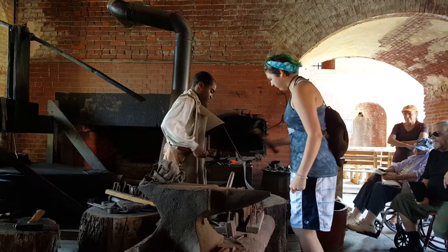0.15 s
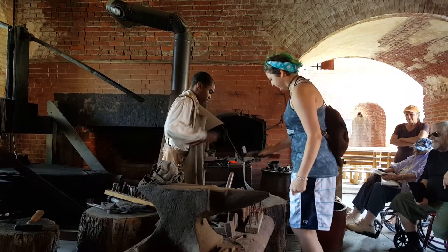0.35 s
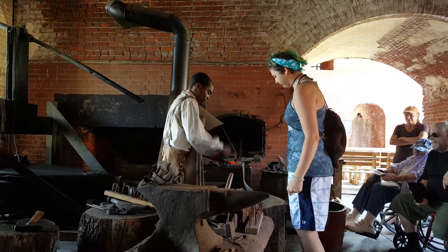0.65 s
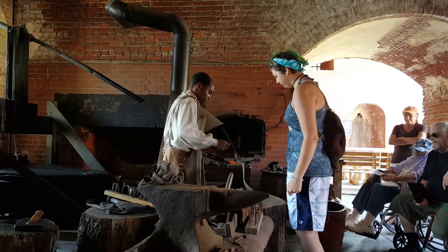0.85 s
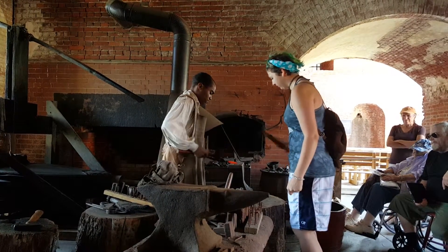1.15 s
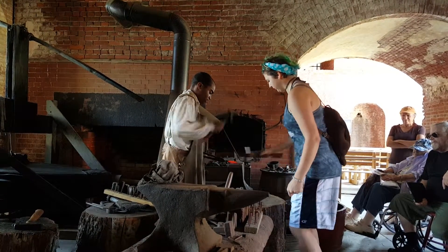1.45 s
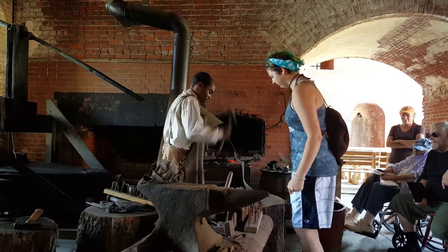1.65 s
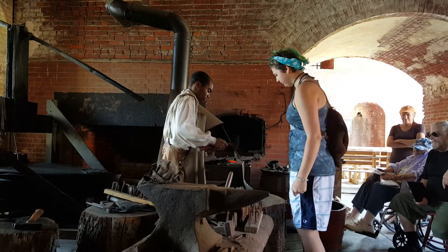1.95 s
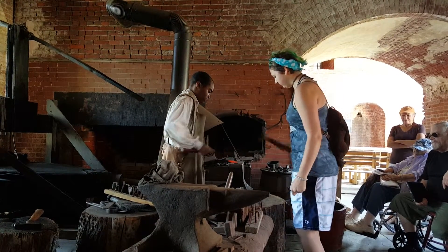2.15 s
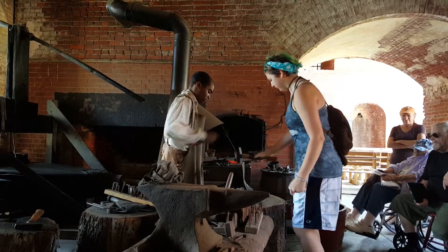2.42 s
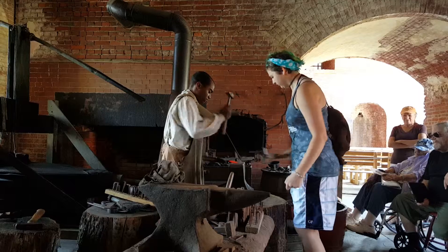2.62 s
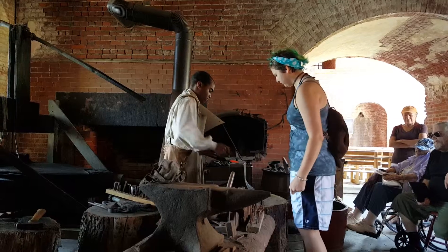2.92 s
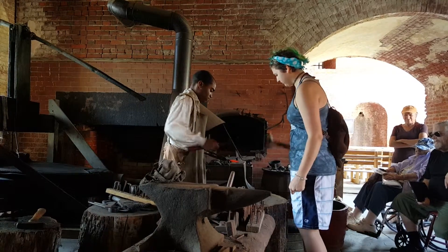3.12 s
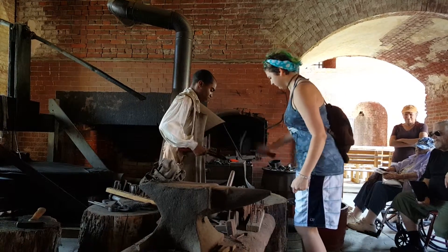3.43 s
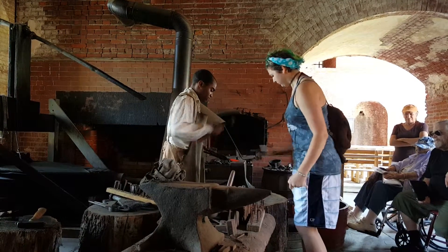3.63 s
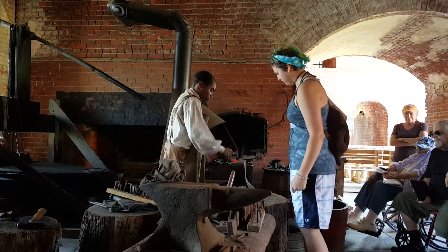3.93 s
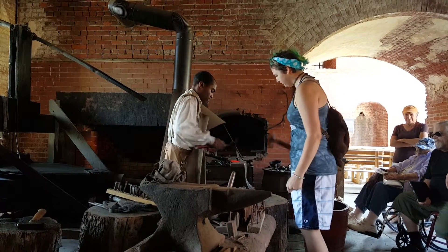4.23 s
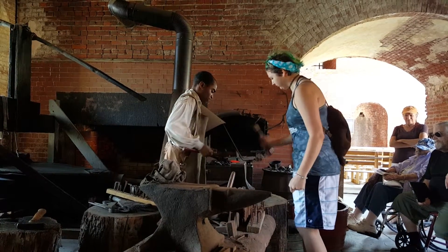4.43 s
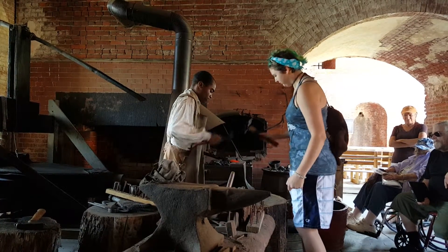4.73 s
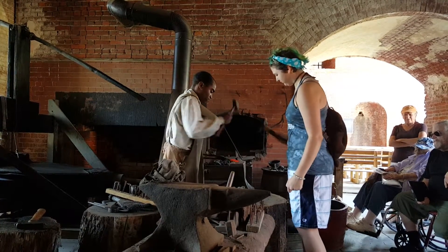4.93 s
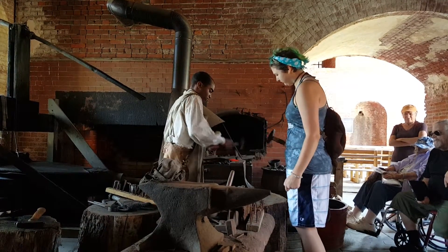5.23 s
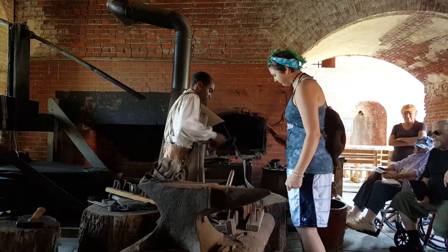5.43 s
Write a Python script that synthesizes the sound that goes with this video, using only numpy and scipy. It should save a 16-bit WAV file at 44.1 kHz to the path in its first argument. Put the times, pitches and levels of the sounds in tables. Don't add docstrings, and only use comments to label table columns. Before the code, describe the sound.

Ten hard, ringing hammer blows on an anvil echo under a brick arch, with faint metal ticks and a soft fire rumble behind.

```python
import sys
import numpy as np
from scipy import signal
from scipy.io import wavfile
from scipy.ndimage import uniform_filter1d

SR = 44100
rng = np.random.default_rng(int(sys.argv[2]) if len(sys.argv) > 2 else 0)


def persist_wave(psi):
    counts = np.round(np.clip(psi, -1, 1) * 32767).astype(np.int16)
    wavfile.write(sys.argv[1], SR, np.atleast_2d(counts).T)


def to_linear_factor(level_db):
    exponent = np.asarray(level_db, float) / 20
    return 10 ** exponent


N = 245637
LEAD = SR // 2


def evened(x):
    return x / np.sqrt(np.mean(x ** 2) + 1e-20)


def unit(x):
    return x / np.linalg.norm(x)


def read(points, hz):
    f, value = np.transpose(points)
    return np.interp(np.log(hz + 1), np.log(f + 1), value)


def add(mix, s, sound):
    part = mix[LEAD + round(s * SR):][:len(sound)]
    part += sound[:len(part)]


def causal(points, size=2048):
    hz = abs(np.fft.fftfreq(size, 1 / SR))
    log_gain = np.log(to_linear_factor(read(points, hz)))
    spectrum = np.exp(np.conj(signal.hilbert(log_gain)))
    return np.fft.ifft(spectrum).real[:size // 2]


def ring(pitches, modes, spread_db, chance, size):
    db, t60 = np.transpose(modes)[:, :, None]
    hz = np.array(pitches)[:, None]
    t = np.arange(size) / SR
    start_db = db + spread_db * chance[:len(modes), None]
    return (to_linear_factor(start_db - 60 * t / t60) * np.sin(2 * np.pi * hz * t)).sum(0)


# (f/Hz, likeness from 0 to 1)
LIKENESS = [(60, 1), (300, 0.87), (700, 0.82), (1000, 0.067), (1400, 0.48), (2000, 0.015), (15000, 0.0092)]


def field(gain, size):
    frames, hz = size // 128 + 5, np.fft.rfftfreq(512, 1 / SR)
    a, b, c, d = rng.standard_normal((frames, 257, 4)).T
    same = np.clip(read(LIKENESS, hz), -1, 1)[:, None]
    left, other = a + 1j * b, c + 1j * d
    right = same * left + np.sqrt(1 - same ** 2) * other
    spectra = np.array([left, right]) * gain(hz[:, None], np.arange(frames) * 128 / SR)
    return signal.istft(spectra, nperseg=512, noverlap=384)[1][:, :size]


def levels(layers, force_db, *manner):
    return force_db + np.array(layers) @ [1, *manner]


# (t/s, force level/dB, bareness of the iron, landing spot from heel -1 to face 1, hammer tilt)
BLOWS = [
    (0.3671, 1.84, 0.27, 0.4, 0.3),
    (0.7671, 0.8, -0.064, -0.4, 0.49),
    (1.4487, 0.95, -0.28, 0.3, -.1),
    (1.8224, -0.6, 0.11, -0, 1.2),
    (2.4951, -3.5, -0.81, 0.39, -0.22),
    (2.8798, 0.4, -0.29, 0.8, 0.35),
    (3.5573, 1.1, 0.049, -0.5, 0.67),
    (4.007, 0.7, 0.084, 0, 0.49),
    (4.6375, 2.5, 1, 0.3, -.3),
    (5.2266, -5, -0.15, 0.5, -.1),
]
# (force level/dB, bareness, landing spot, tilt)
EARLIER_BLOW = (1.5, 0, -0.5, 0.5)
# (plain level/dB, change/dB per bareness, per spot, per tilt)
CONTACT = [
    (-8.5, -0.66, -0.4, -0.5),
    (-23, -5.5, 0.7, 0),
    (-26.5, -5.5, 2, 0.5),
    (-16.5, 1.9, -0.5, 4.3),
    (-19.5, 2.4, 2.7, -2.5),
]
# (plain level/dB, change/dB per bareness, per spot, per tilt)
PARTS = [
    (-20.5, -3.5, -2, 4),
    (-22, 0.4, -12, -4.6),
    (-22, 10.5, 2.9, 5.5),
    (-23, 4.5, -7, -2.5),
    (-14, 1, 1.5, -8),
]
ANVIL_HZ = [
    [1838, 2057.5, 2060, 2053],
    [2651, 2661, 5524],
    [3578, 3584],
    [4312, 4329],
    [4500, 5467, 5226, 5978, 6823, 7870, 9020, 9792, 10085, 10821, 12300],
]
# (level/dB, t60/s)
ANVIL = [
    [(-3.5, 0.15), (-6.5, 0.56), (-5.5, 0.56), (-13.5, 0.42)],
    [(-9, 0.73), (-2.5, 0.69), (-14, 0.52)],
    [(-5.5, 0.25), (-5, 0.29)],
    [(-6, 0.3), (-11.5, .22)],
    [(-15, .3), (-18, 0.3), (-15.5, 0.35), (-34.5, 0.2), (-26.5, 0.21), (-19, 0.61), (-31.5, .25),
     (-15.5, 0.21), (-19.5, .25), (-10, 0.23), (-24.5, .18)],
]
HEAD_HZ = [2330, 9600, 12300]
# (level/dB, t60/s)
HEAD = [(-6, 0.0047), (-12, 0.0021), (0, 0.016)]
# (f/Hz, level/dB)
CRACK_COLOUR = [(2500, -23), (5000, -8), (6200, 0), (8500, 5), (10500, 5), (12500, 9), (15300, 2),
                (16300, -46)]
# (f/Hz, level/dB)
LOW_SLAP = [(1100, -21), (1750, 4.5), (2300, 5.5), (2800, -2.5), (3100, -19), (4000, -29.5)]
# (f/Hz, level/dB)
HIGH_SLAP = [(2300, -34.5), (3200, 0), (4300, 3.5), (5000, 1.5), (5550, 4.5), (5800, -21), (9000, -30.5)]
# (f/Hz, level/dB)
KNOCK_COLOUR = [(150, -11.5), (350, -8.5), (520, -0.5), (800, 0.1), (1200, -10), (1600, -2.5),
                (2500, -16.5), (6000, -30.5)]
# (f/Hz, level/dB)
THUD_COLOUR = [(40, -35.5), (70, 0), (150, -0.5), (330, -4.5), (520, -5), (1000, -31), (3000, -46.5)]


def hammer():
    iron, anvil, push = np.zeros((3, N + LEAD))
    t = np.arange(400) / SR
    earlier_s, travel_s = -0.3, 0.00046
    rough_db, grit_t60 = -7, 0.007
    landing_db = 1.5
    for s, *blow in [(earlier_s, *EARLIER_BLOW)] + list(BLOWS):
        s = s + travel_s
        crack_db, boom_db, knock_db, low_db, high_db = levels(CONTACT, *blow)
        contact = to_linear_factor(rough_db) * unit(rng.standard_normal(len(t)) * to_linear_factor(-60 * t / grit_t60))
        contact[:8] += unit(np.diff(signal.windows.gaussian(9, 0.8)))
        add(iron, s, to_linear_factor(crack_db + 13) * unit(np.convolve(contact, causal(CRACK_COLOUR))))
        clank = ring(HEAD_HZ, HEAD, 0.56, rng.standard_normal(len(HEAD)), size=600)
        add(iron, s, to_linear_factor(crack_db + 5.5) * unit(clank))
        add(iron, s, to_linear_factor(low_db + 14.5) * unit(np.convolve(contact, causal(LOW_SLAP))))
        add(iron, s, to_linear_factor(high_db + 21.5) * unit(np.convolve(contact, causal(HIGH_SLAP))))
        add(iron, s, to_linear_factor(knock_db + 20) * unit(causal(KNOCK_COLOUR)))
        add(iron, s, to_linear_factor(boom_db + 17.5) * unit(causal(THUD_COLOUR)))
        for pitches, modes, part_db in zip(ANVIL_HZ, ANVIL, levels(PARTS, *blow)):
            chance = rng.standard_normal(len(modes))
            add(anvil, s, to_linear_factor(part_db - 4.5) * ring(pitches, modes, landing_db, chance, size=SR))
        add(push, s, to_linear_factor([boom_db]))
    return iron, anvil, push


# (f/Hz, t60/s, build-up/s, tail over direct level/dB)
VAULT = [(64, 1, 0.011, 22.5), (160, 0.64, 0.007, 15), (404, 0.62, 0.018, 13.5), (1130, 0.59, 0.0009, 18),
         (2800, 0.4, 0.018, 14), (4820, 0.41, 0.02, 10.5), (8100, 0.38, 0.0037, 6),
         (12500, 0.31, 0.00041, 0.5), (15500, .22, .001, 3.5)]
# (t/s, level/dB)
ECHOES = [(.0025, 1.5), (.009, -1.5), (0.0218, -10), (0.025, -20.5)]
VAULT_HZ = [72, 102, 135, 160, 205, 250, 315, 445]
# (level/dB, t60/s)
VAULT_MODES = [(-2.5, 0.82), (-7, 1.47), (5, 0.41), (4.5, 0.45), (-11.5, 0.57), (-30, 0.69), (-1, 0.36),
               (-5.5, 0.47)]


def vault(iron, anvil, push):
    bands, *columns = np.transpose(VAULT)

    def decay(hz, s):
        t60, rise, wet_db = (read(np.transpose([bands, column]), hz) for column in columns)
        return to_linear_factor(wet_db - 60 * s / t60) * (1 - np.exp(-s / rise)) / np.sqrt(t60)

    tail = field(decay, size=SR) * to_linear_factor(-56.5)
    tail[:, :60] = 0
    early = np.zeros((2, SR))
    for s, db in ECHOES:
        early[[0, 1], round(s * SR) + rng.integers(0, 6, 2)] += to_linear_factor(db)
    early = uniform_filter1d(early, size=4)
    direct = np.zeros((2, SR))
    direct[[0, 1], [5, 0]] = 1
    t = np.arange(SR) / SR
    boom = to_linear_factor(-0.5) * ring(VAULT_HZ, VAULT_MODES, 0, np.zeros(len(VAULT_HZ)), size=SR)
    boom *= (1 - np.exp(-t / 0.015)) ** 2
    boom[2400:] += to_linear_factor(-12) * boom[:-2400]
    wet = signal.fftconvolve(iron[None], direct + early + tail, axes=1)
    wet += signal.fftconvolve(push[None], boom[None], axes=1)
    wet += signal.fftconvolve(anvil[None], 0.6 * direct + 0.4 * tail, axes=1)
    return wet[:, LEAD:LEAD + N]


# (t/s, peak level/dB, t60/s)
TICKS = [(.009, -52.5, 0.012), (.106, -52.5, 0.024), (.1112, -45.5, .026), (.121, -56.5, 0.011),
         (.146, -67.5, 0.0062), (.6434, -50, 0.0087), (1.373, -51.5, .01), (1.4173, -49.5, 0.034),
         (2.0728, -47.5, 0.0092), (2.3876, -52, 0.0048), (2.729, -53, 0.014), (3.306, -60.5, 0.029),
         (3.315, -54, .0078), (3.335, -57, 0.011), (3.416, -57.5, 0.019), (3.54, -49, 0.038),
         (4.233, -48.5, .012), (4.2578, -45.5, 0.012), (4.416, -59.5, 0.024)]
# (peak t/s, level/dB, rise/s, fall/s, both over 20 dB)
SCUFF = [
    (4.455, -60, .05, .11),
]
SCUFF_SPAN = (4.4, 4.62)
# (f/Hz, level/dB per Hz)
SCUFF_COLOUR = [(1470, -48.5), (2500, 0.5), (3750, -5), (5010, 4), (6010, -8.5), (12100, -12),
                (15500, -23.5)]


def tongs():
    out, t = np.zeros(N + LEAD), np.arange(3000) / SR
    bright = signal.butter(1, [6500, 18000], "band", fs=SR)
    for s, db, t60 in TICKS:
        grit = rng.standard_normal(len(t)) * to_linear_factor(-60 * t / max(t60, 0.004))
        add(out, s, to_linear_factor(db + 4) * signal.lfilter(*bright, grit))
    t = np.arange(*SCUFF_SPAN, 1 / SR)
    rub = evened(np.convolve(rng.standard_normal(len(t)), causal(SCUFF_COLOUR), "same"))
    strokes = np.zeros(len(t))
    for s, db, rise, fall in SCUFF:
        strokes += to_linear_factor(db - 20 * np.maximum((s - t) / rise, (t - s) / fall))
    add(out, t[0], rub * strokes * signal.windows.tukey(len(t), 0.3))
    return out


# (t/s, level/dB)
FORGE = [(0, -39.5), (0.199, -44.5), (1.42, -46.5), (1.951, -45), (2.25, -57.5), (2.47, -56), (2.51, -51),
         (2.85, -46), (3.53, -48.5), (4.4, -50.5), (4.75, -52), (5.05, -58), (5.2, -56), (5.24, -53.5),
         (5.57, -53)]
# (f/Hz, level/dB per Hz)
RUMBLE = [(15, -71), (25, -12.5), (270, 1.5), (293, 2), (323, -12), (517, -9.5), (570, -31.5), (659, -12.5),
          (1200, -26.5), (1560, -47), (2640, -120)]
# (f/Hz, level/dB per Hz)
HISS = [(410, -34), (700, -7.5), (1190, -15), (1230, -11), (2590, -14.5), (3110, -26), (4100, -20),
        (5940, -32), (15200, -41.5), (16400, -31.5)]


def forge():
    draught_db = np.interp(np.arange(N) / SR, *np.transpose(FORGE))
    lumps = evened(uniform_filter1d(rng.standard_normal(N), 3000))
    rumble = evened(field(lambda hz, _: to_linear_factor(read(RUMBLE, hz)), size=N))
    hiss = evened(field(lambda hz, _: to_linear_factor(read(HISS, hz)), size=N))
    hiss_db = -59 + 0.69 * (draught_db - draught_db.mean())
    return rumble * to_linear_factor(draught_db + 0.53 * lumps) + hiss * to_linear_factor(hiss_db)


def scene():
    iron, anvil, push = hammer()
    ticks = tongs()
    blows = vault(iron + to_linear_factor(-18) * ticks, anvil, push)
    forge_db = np.interp(np.arange(N) / SR, *np.transpose(FORGE))
    dip_db = np.minimum(forge_db + 51.5, 0)
    return (blows + ticks[LEAD:]) * to_linear_factor(0.49 * dip_db) + forge()


def low_pass(x):
    return signal.sosfilt(signal.butter(12, 16560, fs=SR, output="sos"), x)


# (f/Hz, left over right level/dB)
PORTS = [(60, 0.3), (600, -0.5), (1300, -2), (2200, -5), (3000, -1), (4500, -9), (5500, -5), (6500, 1.5),
         (8000, -1), (9800, 3), (11000, 6.5), (12500, -17), (14000, 2.5), (16000, 14.5)]


def record(dry):
    ports = [causal([(hz, side * db / 2) for hz, db in PORTS]) for side in (1, -1)]
    coloured = signal.fftconvolve(dry, np.array(ports), axes=1)[:, :N]
    no_deep_bass = signal.butter(4, 46, "high", fs=SR, output="sos")
    coloured = signal.sosfilt(no_deep_bass, coloured)
    mix = np.clip(coloured, -1, 1)
    return low_pass(mix)


dry = scene()
out = record(dry)
persist_wave(out)
```